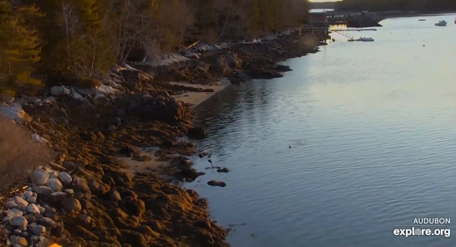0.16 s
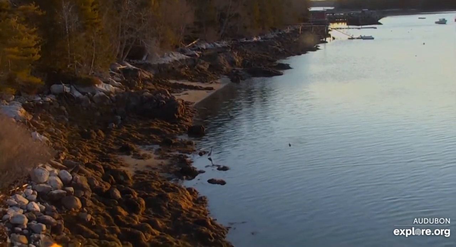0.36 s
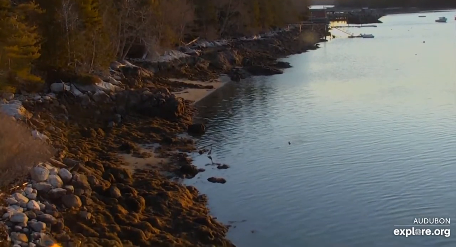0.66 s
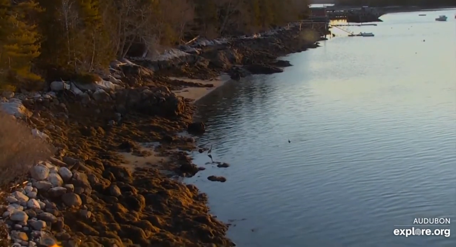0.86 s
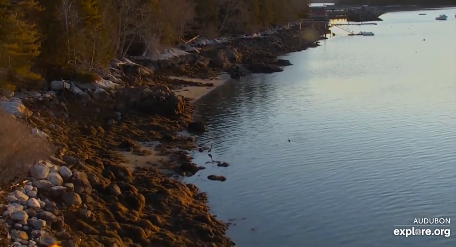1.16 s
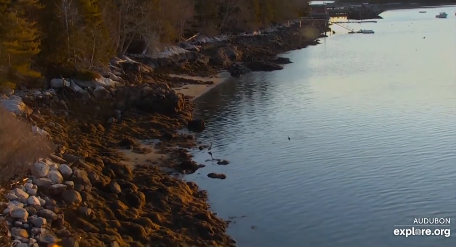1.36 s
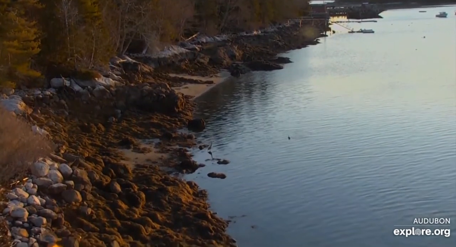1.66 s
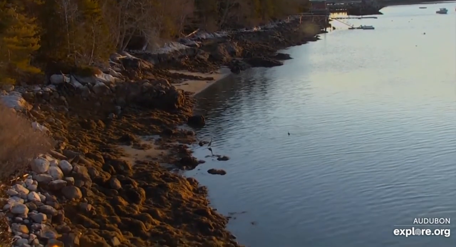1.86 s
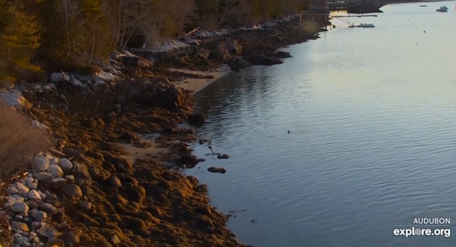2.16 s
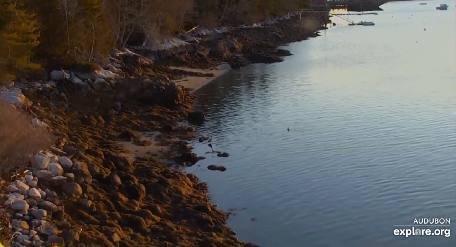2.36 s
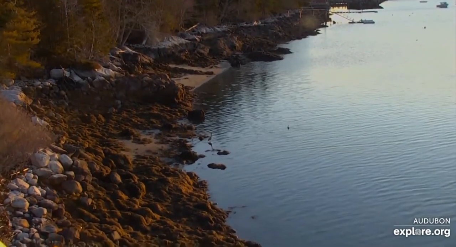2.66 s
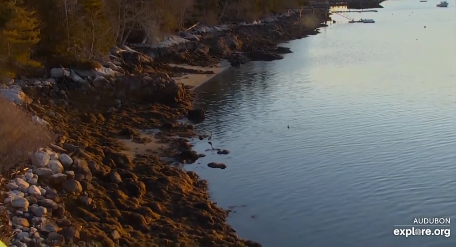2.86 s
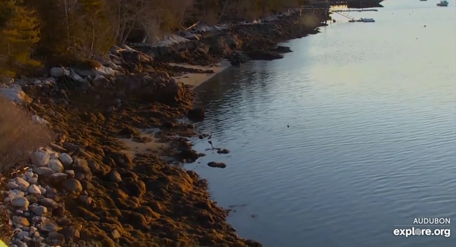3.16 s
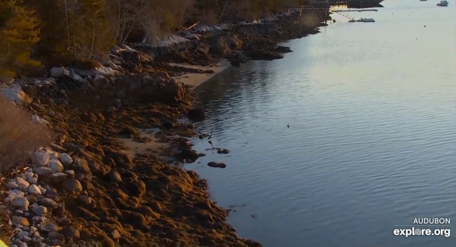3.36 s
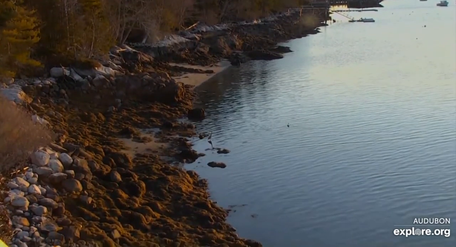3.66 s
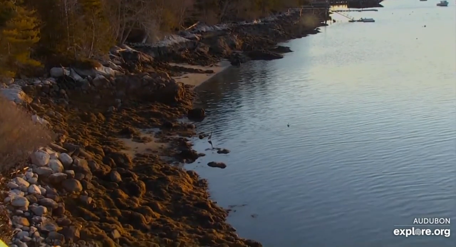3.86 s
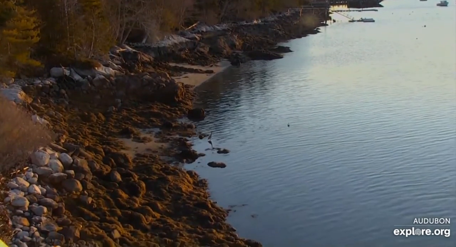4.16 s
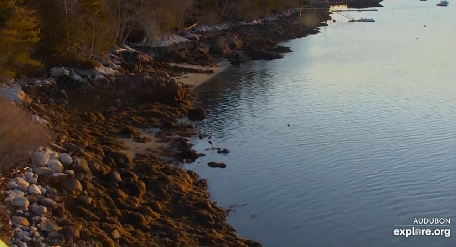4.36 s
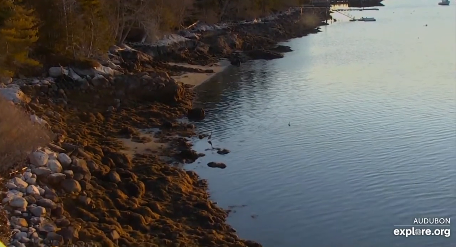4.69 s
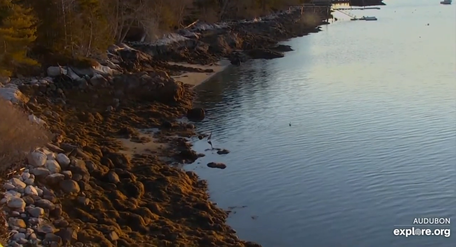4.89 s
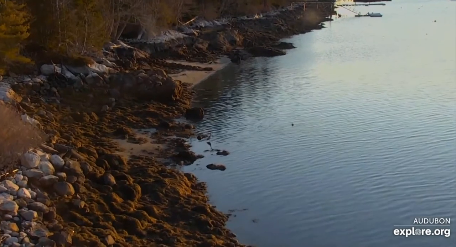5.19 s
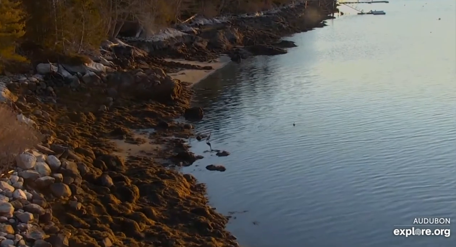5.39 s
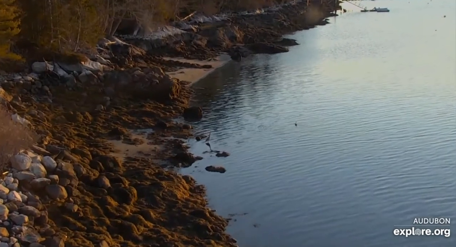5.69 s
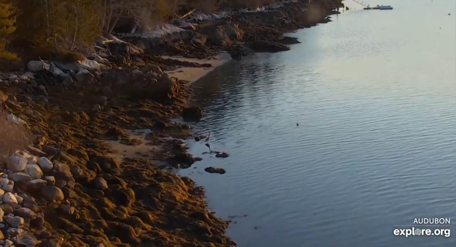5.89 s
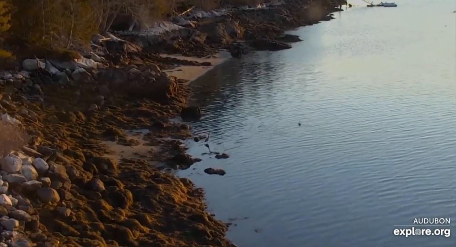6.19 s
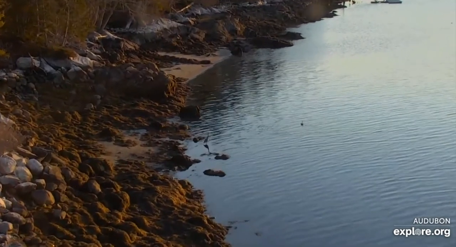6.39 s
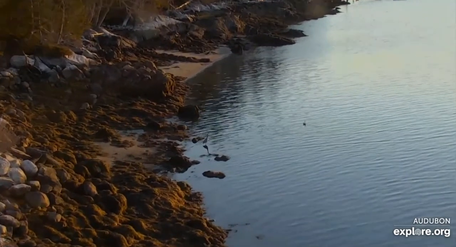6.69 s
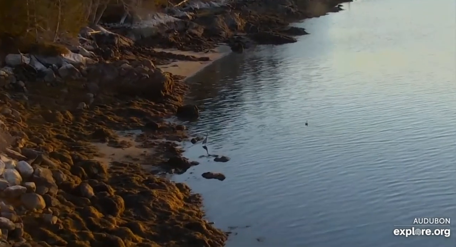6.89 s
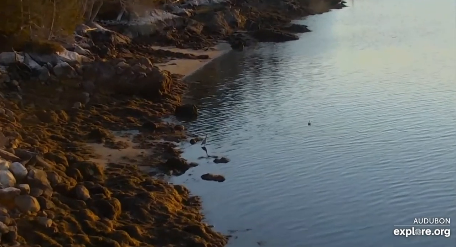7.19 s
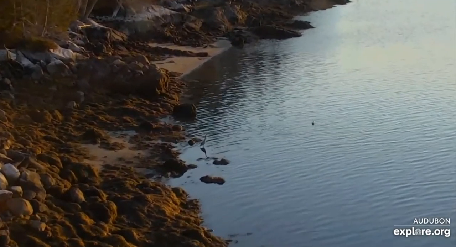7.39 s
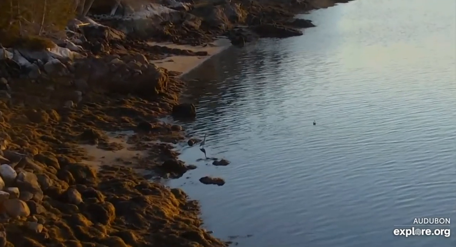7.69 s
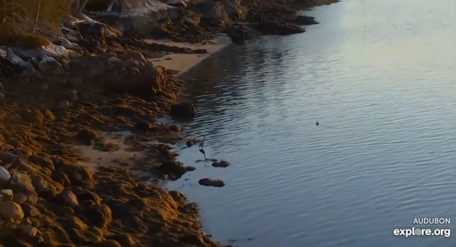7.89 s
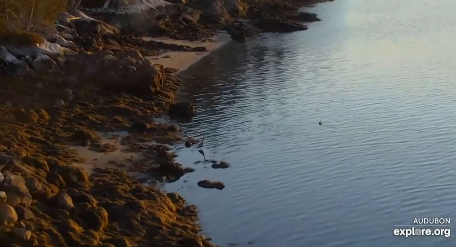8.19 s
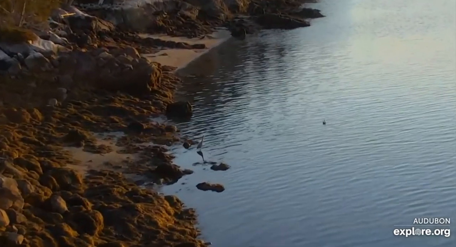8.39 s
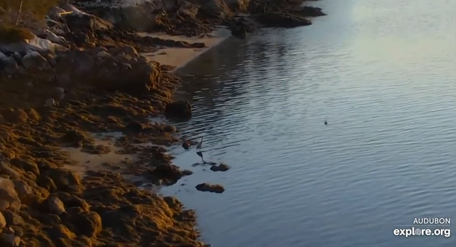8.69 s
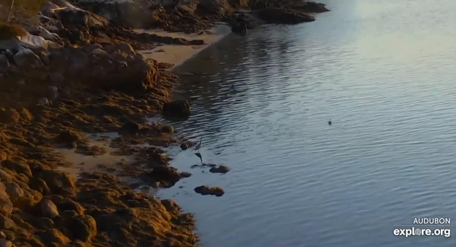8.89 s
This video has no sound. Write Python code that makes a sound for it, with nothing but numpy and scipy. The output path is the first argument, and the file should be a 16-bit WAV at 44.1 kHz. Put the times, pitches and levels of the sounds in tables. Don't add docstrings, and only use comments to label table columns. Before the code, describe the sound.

Wind buffets the microphone, then six piercing, distorted, downward osprey whistles ring out over quiet water, with faint hum and distant songbird.

```python
import sys
import numpy as np
from scipy import signal
from scipy.fft import rfft, irfft
from scipy.io import wavfile
from scipy.ndimage import uniform_filter1d

SR = 44100
rng = np.random.default_rng(int(sys.argv[2]) if len(sys.argv) > 2 else 0)


def transcribe(signal):
    frames = np.atleast_2d(signal).T
    limited = np.clip(frames, -1, 1)
    pcm = np.round(limited * 32767).astype(np.int16)
    wavfile.write(sys.argv[1], SR, pcm)


def voltage_ratio(level):
    return 10 ** (np.asarray(level, float) / 20)


N = 399105
T = np.arange(N) / SR

# peak t/s, thump level/dB, flutter level/dB relative to the thump,
# fade/ms
GUSTS = [(0.045, -24.5, 8, 81), (0.176, -26, 0.5, 52), (.32, -39.5, -40, 57), (.55, -40.5, -14.5, 120),
         (.67, -46.5, -4, 40), (.85, -40.5, -16, 99), (2.19, -53, -9, 40), (3.15, -49.5, -14, 80),
         (3.28, -47, 14.5, 18), (3.34, -53.5, -8, 40), (3.5, -57.5, -25, 110), (5.468, -35, -5.5, 18.11),
         (5.86, -43, -30, 80), (6.5, -46.5, -27.5, 100), (6.6, -53.5, -11.5, 33.3), (8.2, -56.5, -25, 80),
         (6.694, -39, 16.5, 12), (6.752, -37, 3, 15), (7.05, -49, -31, 150), (7.8, -43, -21, 50),
         (7.91, -45, -21, 80), (8.52, -39.5, -3, 73), (8.7, -37.5, -1, 50), (8.9, -37, -13, 120),
         (9.05, -62, -11, 30)]
# centre t/s, level/dB, half-width/ms, f/Hz
BUFFETS = [(.012, -19, 9, 70.7), (.04, -14, 9, 60.3), (.058, -11.5, 12, 62), (.075, -19, 8, 65.3),
           (.094, -20, 9, 55), (.113, -18, 11, 75), (.174, -13, 12.3, 73), (.215, -14, 6.3, 73),
           (.31, -39, 8.5, 70), (.344, -27, 9.2, 65), (.37, -32, 8.6, 70)]
# t/s, level/dB
POLE_SWAY = [(0, -45), (1, -66), (2, -80), (3.2, -64), (3.7, -84), (5.3, -80), (5.7, -55), (8.3, -54),
             (9.05, -50)]
# f/Hz, level/dB per Hz
THUMP_COLOUR = [(25, -22), (45, -1.5), (65, -1), (90, -5.5), (130, -23.5), (200, -44.5), (1000, -90)]
CALM_THUMP_DB, CALM_FLUTTER_DB = -70, -61

# t/s, f/Hz, level/dB
HUM = [(0, 105.7, -47), (1, 105.5, -52), (3, 105.7, -54), (4.5, 104, -62), (5.4, 105.5, -64),
       (5.699, 105.5, -69.5), (7.001, 104.5, -70.5), (7.499, 105.6, -61), (8.4, 105.7, -54.5),
       (9.05, 106.7, -48)]
# f/Hz, level/dB
WHINES = [(848, -74.5), (1168, -84), (1696, -71), (2121, -77.5), (2331, -82)]
SCAN_HZ, SCAN_BEAT_HZ, SCAN_DB = 15735, 13.04, -80

# f/Hz, level/dB per Hz
SHORE_COLOUR = [(88, -35), (150, -15.5), (300, -3.5), (504, -1.5), (700, -2), (1690, -5), (2020, -8),
                (2400, -6.5), (2700, -16), (3040, -18), (4500, -18.5), (6000, -24.5), (12400, -28),
                (14500, -25.5)]
SHORE_DB = -58.5

# t/s, f/Hz
GLIDES = [
    [(0.962, 3200), (0.968, 2850), (0.9745, 2542), (0.984, 2470), (0.9926, 2422), (1.0216, 2241),
     (1.0512, 2003), (1.068, 2006)],
    [(2.149, 3173), (2.1578, 2706), (2.1597, 2657), (2.1763, 2565), (2.1906, 2480), (2.244, 2058),
     (2.262, 1992)],
    [(3.243, 3776), (3.252, 3395), (3.2576, 2990), (3.2637, 2890), (3.273, 2781), (3.312, 2401),
     (3.333, 2255), (3.365, 2135)],
    [(4.328, 3255), (4.3352, 2909), (4.3402, 2650), (4.3517, 2561), (4.3754, 2423), (4.4089, 2241),
     (4.445, 2092)],
    [(5.386, 4307), (5.395, 4256), (5.4006, 3988), (5.4092, 3457), (5.4192, 3095), (5.4465, 2676),
     (5.4795, 2327), (5.52, 2200)],
    [(6.66, 3845), (6.669, 3495), (6.6749, 3022), (6.6816, 2767), (6.715, 2418), (6.7471, 2187),
     (6.757, 2140), (6.785, 2105)],
]
# t/s, level/dB
LOUDNESS = [
    [(0.962, -48), (0.968, -41), (0.9745, -15.5), (0.9915, -30), (.996, -17), (1.012, -13.5), (1.0165, -23),
     (1.021, -11), (1.0347, -3), (1.042, -3.5), (1.0519, -21.5), (1.066, -36)],
    [(2.1495, -50), (2.1554, -6.5), (2.1631, -2), (2.177, 1.1), (2.188, 0), (2.2, -6), (2.21, -26.5),
     (2.212, -10.5), (2.2374, -4.5), (2.2411, 0), (2.2696, -29)],
    [(3.243, -30), (3.2523, -5), (3.2673, 6), (3.298, 3.5), (3.3064, 1), (3.3237, -23.5), (3.3257, -7),
     (3.3398, -15), (3.3432, -5), (3.3575, -21.5)],
    [(4.328, -51), (4.3356, -6), (4.3453, -0.6), (4.352, -1.25), (4.361, -1.25), (4.3703, -2.5),
     (4.3867, -17.5), (4.4052, -7), (4.409, -25), (4.4162, -6.5), (4.432, -29.5), (4.437, -21),
     (4.445, -32.5)],
    [(5.3862, -36), (5.3969, -7), (5.403, -5), (5.4105, 2), (5.417, -0.5), (5.424, 6), (5.4488, 6.5),
     (5.463, 4), (5.4704, -2), (5.4812, -24), (5.4832, -9.5), (5.5062, -18), (5.5193, -24.5)],
    [(6.6621, -36.5), (6.6703, -5), (6.6739, -12.5), (6.6759, 1), (6.686, -0.5), (6.7015, 5.5),
     (6.7258, -2), (6.744, -1), (6.7557, 4), (6.762, -4.5), (6.7777, -12), (6.7826, -35.5)],
]
# centre t/s, level/dB, half-width/ms, beat f/Hz, t/s of a null
BEATS = [(1.0376, -18.5, 21.1, 100, 1.0471), (2.2314, -14.4, 15.6, 116, 2.2151),
         (3.3271, -17.8, 14.0, 93, 3.3288), (4.4011, -22.6, 29.7, 140, 4.3968),
         (5.4884, -19.8, 10.9, 177, 5.4839), (6.733, -13.1, 4.0, 90, 6.7207)]
# t/s, level/dB
OCTAVE = [
    [(.97, -46), (.981, -22), (.996, -22), (1.004, -31), (1.016, -38), (1.023, -18), (1.031, -24),
     (1.043, -17), (1.05, -32), (1.066, -58)],
    [(2.156, -48), (2.164, -17), (2.178, -19), (2.193, -12), (2.209, -24), (2.217, -13), (2.228, -24),
     (2.233, -14), (2.25, -22), (2.262, -52)],
    [(3.249, -58), (3.263, -19), (3.281, -10), (3.29, -12), (3.298, -38), (3.309, -9), (3.319, -13),
     (3.327, -35), (3.333, -15), (3.365, -42)],
    [(4.334, -45), (4.345, -23), (4.356, -23), (4.37, -13), (4.386, -12.5), (4.395, -31), (4.404, -17),
     (4.417, -35), (4.426, -31), (4.44, -48)],
    [(5.395, -65), (5.414, -33), (5.445, -28), (5.462, -16), (5.471, -10), (5.483, -33), (5.492, -19),
     (5.5, -24), (5.508, -43), (5.518, -50)],
    [(6.666, -60), (6.679, -25), (6.69, -17), (6.7, -38), (6.71, -21), (6.724, -13), (6.736, -15),
     (6.748, -22), (6.762, -28), (6.775, -56)],
]
# echo level/dB, octave level/dB in the echo, upper partials level/dB, haze level/dB
VOICE = [(-31, -18.5, -24, -44.5), (-27.5, -16.5, -27.5, -38.5), (-26.5, -17, -29.5, -36.5),
         (-31, -18.5, -29, -36.5), (-25.5, -19.5, -28.5, -36.5), (-27.5, -19.5, -27, -37.5)]
LEAN = [1, 1, -1, 1, -1, -1]

# arrival/ms, build-up/ms, time to fall 60 dB/s, level/dB
ECHOES = [
    (24.96, 4.4, 0.37, -3),
    (66.05, 4, 0.11, -2),
    (84, 1.8, 0.093, 0.5),
    (100.86, 15, 0.22, -2),
    (146.9, 94, 1.1, -20.5),
    (585, 77, 1.2, -27.5),
]
# f/Hz, level/dB
ECHO_COLOUR = [(1500, -13), (2050, -3.5), (2330, 1), (2650, -3), (3400, -18), (4150, -7), (4600, -1.5),
               (5300, -3), (5900, -24), (12000, -32.5)]
# f/Hz, level/dB
SLAP_COLOUR = [(1800, -8), (2400, -3), (3300, -14), (3900, -10), (4500, 3), (5300, 4), (5900, -14),
               (7200, -3), (9300, -4), (11000, -20)]
SLAP_MS, SLAP_SPREAD_MS, SLAP_DB = 81, 8, 1.5

# t/s, peak level/dB, f/Hz
TICKS = [(1.4094, -68, 4250), (1.7119, -56, 3978), (4.9294, -62, 3544), (6.1598, -55, 3872),
         (7.265, -66, 5210), (8.32, -53, 2000), (8.645, -59.5, 3500), (8.893, -58.5, 2000)]

# share of length (0 to 1), pitch ratio, level/dB
SCOOP = [(0, 1.13, -10), (.25, 1.01, -2), (.45, 1.0, -1), (.74, 1.13, -7), (.8, 1.0, -40), (.86, .87, -16),
         (.93, 1.06, 5), (1, 1.23, -8)]
DROP = [(0, 1.22, -24), (.13, 1.0, 0), (.26, .79, -14), (.4, .69, -13), (.58, .69, -13), (.8, .78, -10),
        (1, .83, -22)]
ARCH = [(0, 0.98, -12), (.2, .98, -5), (.3, 1.04, -9), (.41, 1.14, -1), (.54, 1.26, -5), (.7, 1.4, -9),
        (.8, 1.3, -14), (.88, 1.12, -3), (1, .98, -11)]
RISE = [(0, .92, -9), (.55, 1.0, -1), (.8, 1.025, 0), (1, 1.03, -7)]
HOLD = [(0, 0.97, -7), (.5, 1.0, -2), (1, 1.005, -4)]
FALL = [(0, 1.1, 3), (.5, 1.0, 11), (1, .91, 1)]
# start t/s, length/s, f/Hz, level/dB
SCOOPS = [(2.44, .09, 4340, -58)]
DROPS = [(2.64, .105, 4600, -59), (2.836, .1, 4700, -60), (3.015, .095, 4600, -61), (3.203, .1, 4800, -68),
         (8.176, .11, 4600, -72), (8.362, .12, 4750, -73), (8.543, .1, 4600, -72)]
ARCHES = [(3.6, .122, 4000, -66), (3.858, .128, 4050, -66), (4.135, .128, 3950, -68)]
RISES = [(7.285, 0.039, 4060, -72), (7.7, 0.058, 3380, -73), (7.975, .07, 4330, -70.5),
         (8.7, .07, 4680, -63), (8.79, .046, 2290, -71), (8.96, .06, 4350, -71)]
HOLDS = [(7.5, .16, 2350, -71), (7.9, 0.18, 1665, -63), (7.97, .09, 2330, -70.5), (8.1, 0.36, 1686, -71),
         (8.61, 0.031, 3530, -77), (8.235, .08, 3850, -74), (8.43, .11, 3730, -75), (8.9, 0.085, 2620, -68),
         (8.045, .07, 4420, -77), (8.765, .125, 4760, -74), (9.02, .028, 5750, -70)]
FALLS = [(2.988, 0.036, 5650, -78), (8.76, .02, 2400, -79)]
# centre t/s, level/dB, half-width/ms, f/Hz, width f/Hz
BUZZES = [(3.6, -68, 14, 4500, 1100), (3.856, -67, 13, 4200, 1300), (4.148, -65.5, 18, 4000, 800),
          (8.715, -67, 20, 4450, 400), (8.79, -69, 22, 4700, 350), (8.85, -73, 40, 4700, 250),
          (8.19, -73, 10, 4500, 1200), (8.95, -69, 18, 4050, 900), (7.52, -66, 150, 2350, 450),
          (8.375, -69, 12, 4800, 1100), (4.245, -75, 14, 4600, 600)]

# start t/s, end t/s, click-in level/dB, click-out level/dB
DROPOUTS = [
    (.1395, .16, -23, -23),
    (.269, .2975, -34, -31),
]
CLIP, CEILING = .915, 1.04
TOP_HZ = 15850


def level(x, db):
    return x * voltage_ratio(db) / np.sqrt(np.mean(x ** 2))


def colour(x, points):
    hz, db = np.transpose(points)
    f = np.fft.rfftfreq(len(x), 1 / SR) + 1
    gain = voltage_ratio(np.interp(np.log(f), np.log(hz), db))
    return irfft(rfft(x) * gain, len(x))


def coloured_noise(points, db=0):
    return level(colour(rng.standard_normal(N), points), db)


def band(lo_hz, hi_hz):
    sos = signal.butter(2, [lo_hz, hi_hz], "band", fs=SR, output="sos")
    return level(signal.sosfilt(sos, rng.standard_normal(N)), 0)


def walk(rate):
    k = int(SR / rate)
    steps = np.repeat(rng.standard_normal(N // k + 1), k)
    return 1.7 * uniform_filter1d(uniform_filter1d(steps, k), k)[:N]


def swells(t, rows):
    return sum(voltage_ratio(db) * np.exp(-((t - s) * 1000 / ms) ** 2) for s, db, ms in rows)


def wind():
    calmer_db = np.interp(T, [3.0, 5.6, 8.3, 8.6], [3, -2, -1.5, 4])
    thump = voltage_ratio(CALM_THUMP_DB)
    flutter = voltage_ratio(CALM_FLUTTER_DB + calmer_db)
    for s, thump_db, flutter_db, fade_ms in GUSTS:
        gust = voltage_ratio(thump_db) * np.exp(-abs(T - s) * 1000 / fade_ms)
        thump = thump + gust
        flutter = flutter + voltage_ratio(flutter_db) * gust
    flutter_noise = coloured_noise([(70, -28.5), (110, 6.5), (160, -5.5), (220, -13.0),
                                    (400, -23), (1000, -46), (3000, -71.0)])
    out = thump * voltage_ratio(2.4 * walk(16)) * coloured_noise(THUMP_COLOUR)
    out += flutter * voltage_ratio(-6.0 + 2.4 * walk(22)) * flutter_noise
    for s, db, ms, hz in BUFFETS:
        out += swells(T, [(s, db, ms)]) * np.cos(2 * np.pi * hz * (T - s))
    sway = voltage_ratio(np.interp(T, *np.transpose(POLE_SWAY)))
    return out + sway * band(26, 28)


def motor():
    s, hz, db = np.transpose(HUM)
    loudness = voltage_ratio(np.interp(T, s, db) + 3 + 1.5 * walk(6))
    out = loudness * np.sin(2 * np.pi * np.cumsum(np.interp(T, s, hz)) / SR)
    for hz, db in WHINES:
        loudness = voltage_ratio(db + 2.0 + 2.0 * walk(6.8))
        out += loudness * np.sin(2 * np.pi * np.cumsum(hz + 0.45 * walk(3.5)) / SR)
    beating = np.sin(np.pi * SCAN_BEAT_HZ * (T - 1.395))
    return out + voltage_ratio(SCAN_DB + 3) * beating * np.sin(2 * np.pi * SCAN_HZ * T)


def shore():
    return coloured_noise(SHORE_COLOUR, SHORE_DB) * voltage_ratio(0.4 * walk(1.3))


def osprey():
    near, far = np.zeros(N), np.zeros(N)
    waver, shimmer = voltage_ratio(4.0 * walk(330)), voltage_ratio(1.2 * walk(170))
    haze = coloured_noise([(1000, -20), (2000, 0), (4300, 0), (5800, -6), (7000, -30)])
    for glide, loud, beat, octave, voice, lean in zip(GLIDES, LOUDNESS, BEATS, OCTAVE, VOICE, LEAN):
        echo_db, octave_db, upper_db, haze_db = voice
        s, hz = np.transpose(glide)
        on = slice(int(s[0] * SR), int(s[-1] * SR) + 150)
        t = T[on]
        u = np.linspace(0, 1, len(t))
        pitch = uniform_filter1d(np.interp(t, s, hz), size=150)
        phase = 2 * np.pi * np.cumsum(pitch) / SR
        upper = sum(voltage_ratio(upper_db - 12.0 * k ** 1.2) * np.sin((3 + k) * phase + k) for k in range(3))

        loud_db = uniform_filter1d(np.interp(t, *np.transpose(loud)), size=110)
        near[on] = voltage_ratio(loud_db) * np.sin(phase)
        beat_hz, null_s = beat[3:]
        near[on] -= swells(t, [beat[:3]]) * np.sin(phase + 2 * np.pi * beat_hz * (t - null_s))
        bloom_db = np.interp(t, *np.transpose(octave), left=-70, right=-70)
        bloom = voltage_ratio(uniform_filter1d(bloom_db, size=130)) * shimmer[on] * (1 - u ** 12)
        near[on] += bloom * (np.sin(2 * phase - 1.2) + upper * waver[on])
        near[on] *= lean * signal.windows.tukey(len(t), .12)
        near += swells(T, [(s[0] + .045, haze_db - 10, 42)]) * haze

        effort = (1 - np.exp(-u / 0.18)) * (1 - u ** 2.7)
        overtones = voltage_ratio(octave_db) * (np.sin(2 * phase) + 6.9 * upper)
        far[on] = voltage_ratio(echo_db) * effort * (np.sin(phase) + overtones)
    return near, far


def shore_echo(x):
    t = T[:2 * SR]
    shape = 0
    for start_ms, rise_ms, t60, db in ECHOES:
        age = np.maximum(t - start_ms / 1000, 0)
        shape = shape + voltage_ratio(db - 60 * age / t60) * (1 - np.exp(-age * 1000 / rise_ms))
    returns = shape * rng.standard_normal(len(t))
    after_slap_ms = t * 1000 - SLAP_MS
    slap_shape = voltage_ratio(SLAP_DB) * (after_slap_ms > 0) * np.exp(-abs(after_slap_ms) / SLAP_SPREAD_MS)
    slap = slap_shape * rng.standard_normal(len(t))
    response = (colour(returns, ECHO_COLOUR) + colour(slap, SLAP_COLOUR)) / 30
    return signal.fftconvolve(x, response)[:N]


def ticks():
    out, t = np.zeros(N), T[:200]
    for s, db, hz in TICKS:
        click = np.exp(-t / 0.001139) * np.sin(2 * np.pi * hz * t)
        out[int(s * SR):][:200] += voltage_ratio(db + 10.5) * click
    return out


def songbird():
    out, warble = np.zeros(N + SR), 1 + .006 * walk(220)
    song = ((SCOOP, SCOOPS), (DROP, DROPS), (ARCH, ARCHES), (RISE, RISES), (HOLD, HOLDS), (FALL, FALLS))
    for shape, rows in song:
        share, ratio, shape_db = np.transpose(shape)
        for s, length, hz, db in rows:
            u = np.linspace(0, 1, int(length * SR))
            bend = uniform_filter1d(np.interp(u, share, ratio), size=len(u) // 14)
            pitch = hz * bend * warble[:len(u)]
            loudness = voltage_ratio(db + 5.0 + np.interp(u, share, shape_db)) * signal.windows.tukey(len(u), .1)
            out[int(s * SR):][:len(u)] += loudness * np.sin(2 * np.pi * np.cumsum(pitch) / SR)
    for s, db, ms, hz, width_hz in BUZZES:
        out[:N] += swells(T, [(s, db, ms)]) * band(hz - width_hz / 2, hz + width_hz / 2)
    rough = out[:N] * voltage_ratio(2.2 * walk(130))
    distant = colour(rough, [(1500, 0.5), (3200, -2), (4500, 2.0), (6000, -4)])
    t = T[:SR // 5]
    tail = voltage_ratio(-40 - 60 * t / .32) * rng.standard_normal(len(t))
    return distant + signal.fftconvolve(distant, tail)[:N]


def scene():
    near, far = osprey()
    return (wind() + motor() + shore() + near + shore_echo(far) + ticks() + songbird())[None]


def stalls(x):
    bass = signal.sosfiltfilt(signal.butter(4, 170, fs=SR, output="sos"), x)
    stalled = uniform_filter1d(sum(1. * ((T > a) & (T < b)) for a, b, *_ in DROPOUTS), 12)
    out = x + 0.93 * stalled * (bass - x)
    t = T[:600]
    click = np.exp(-t / 0.0018) * (1 - np.exp(-t / 0.00033))
    for start, end, in_db, out_db in DROPOUTS:
        out[:, int(start * SR):][:, :600] += voltage_ratio(in_db) * click
        out[:, int(end * SR):][:, :600] += voltage_ratio(out_db) * click
    return out


def band_limit(x):
    return signal.sosfilt(signal.butter(12, 16500, fs=SR, output="sos"), x)


def record(dry):
    fine = signal.resample_poly(dry, 2, 1, axis=1)
    shaved = signal.resample_poly(fine - np.clip(fine, -CLIP, CLIP), 1, 2, axis=1)
    x = dry - shaved + 0.6 * uniform_filter1d(shaved, size=700)
    excess = np.maximum(abs(dry) - CLIP, 0)
    overload = np.sqrt(uniform_filter1d(excess, size=120) + 1e-12)
    x = x + overload * (voltage_ratio(-35) * band(3600, 14500) + voltage_ratio(-49) * band(60, 900))
    power = uniform_filter1d(uniform_filter1d(x ** 2, size=60), size=60)
    size = np.sqrt(2 * power + 1e-9)
    fade_in = np.minimum(T / .004, 1)
    x = .95 * x * np.minimum(1, CEILING / size) * fade_in
    x = signal.sosfilt(signal.butter(3, 33, "high", fs=SR, output="sos"), x)
    x = signal.sosfilt(signal.ellip(8, .1, 30, TOP_HZ, fs=SR, output="sos"), x)
    mix = stalls(x)
    return band_limit(mix)


dry = scene()
out = record(dry)
transcribe(out)
```